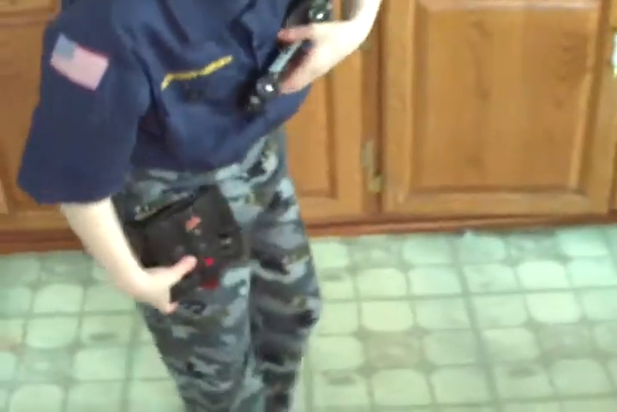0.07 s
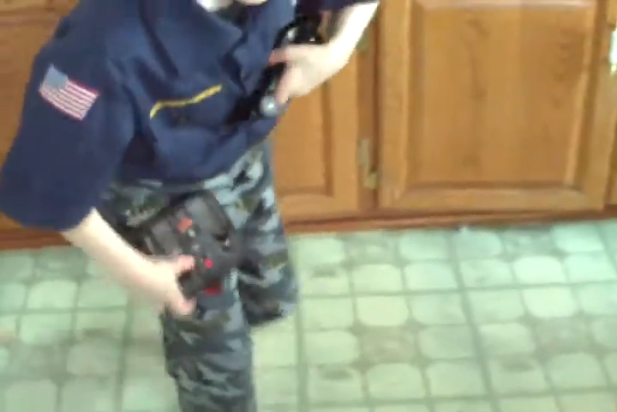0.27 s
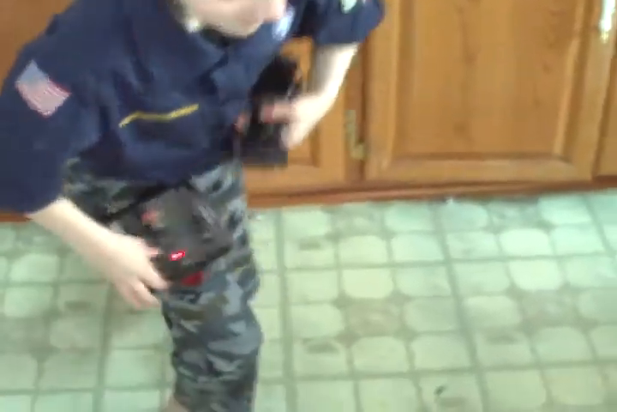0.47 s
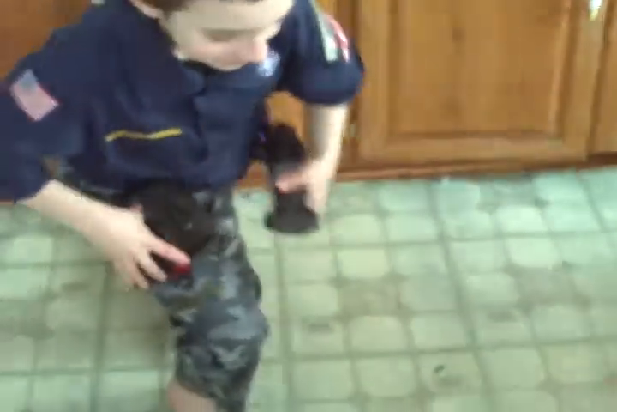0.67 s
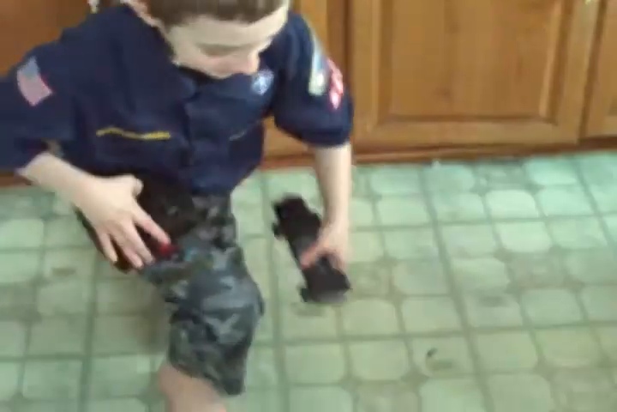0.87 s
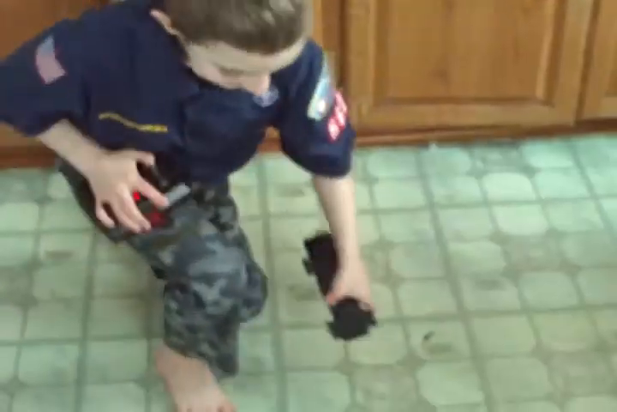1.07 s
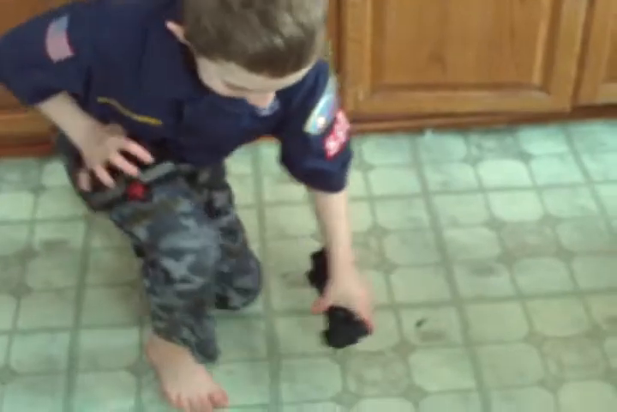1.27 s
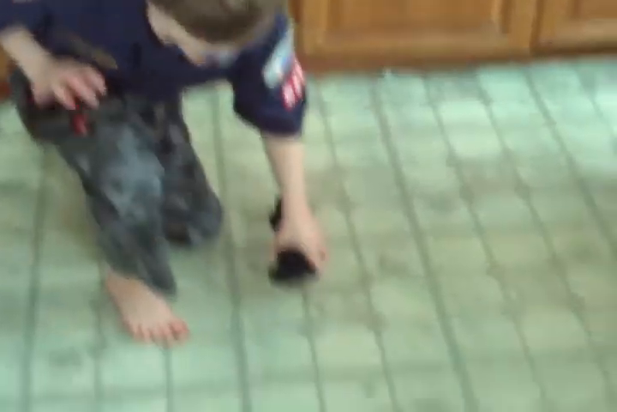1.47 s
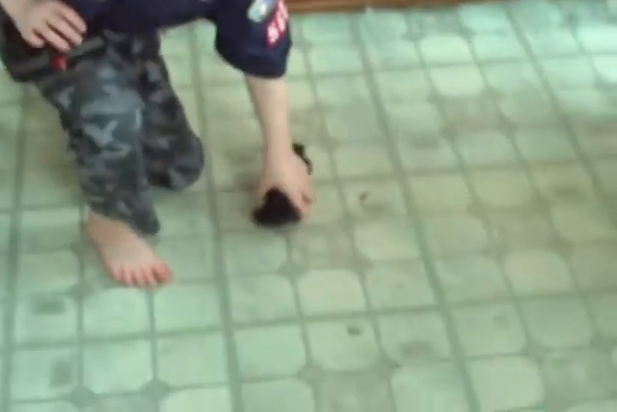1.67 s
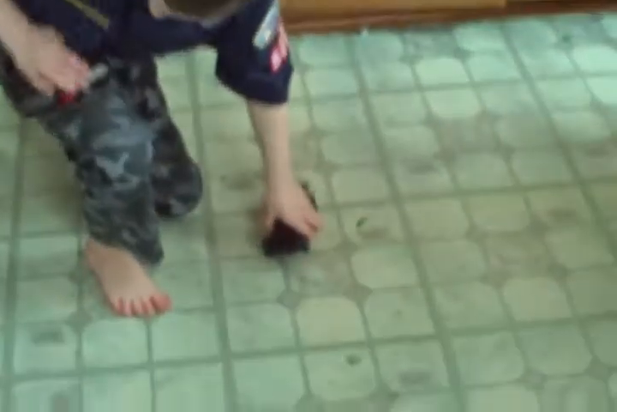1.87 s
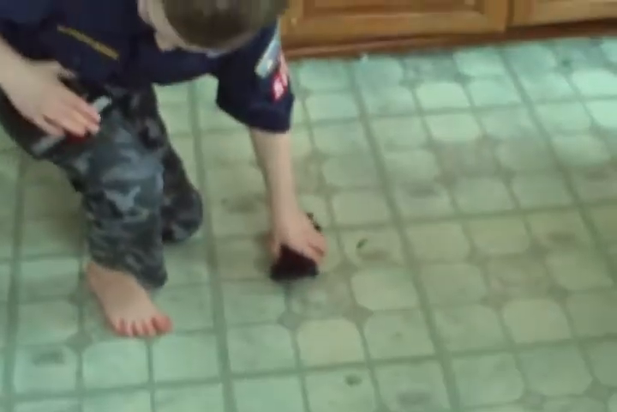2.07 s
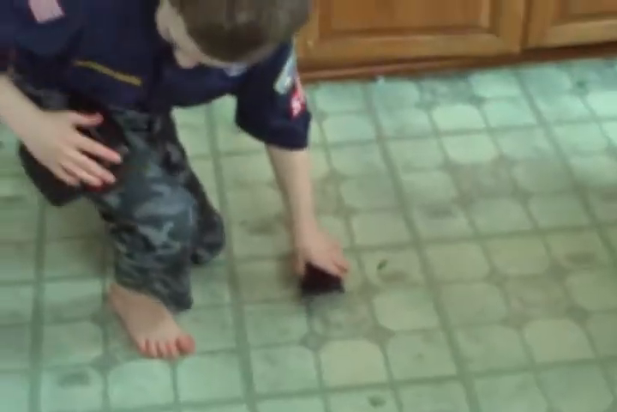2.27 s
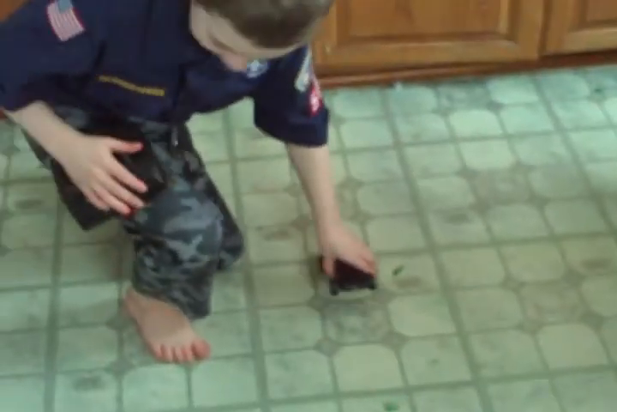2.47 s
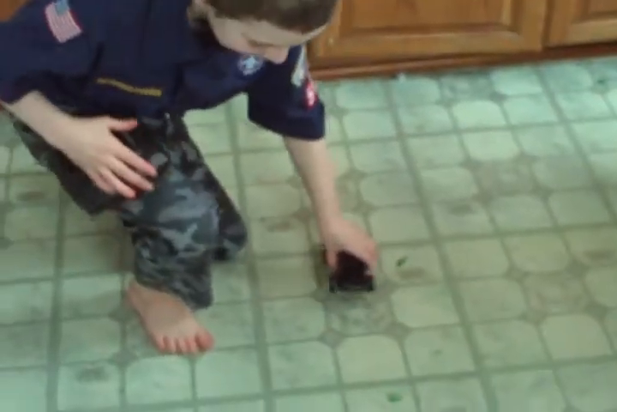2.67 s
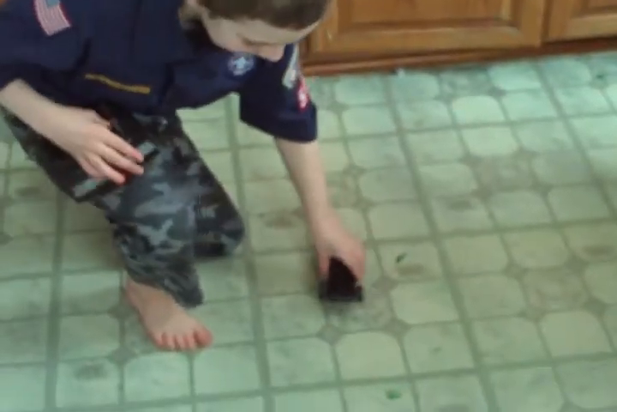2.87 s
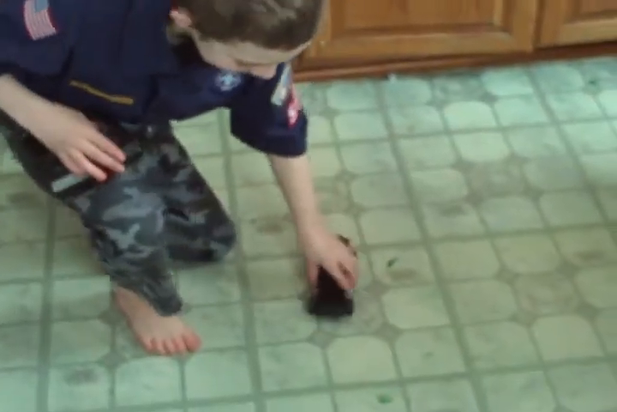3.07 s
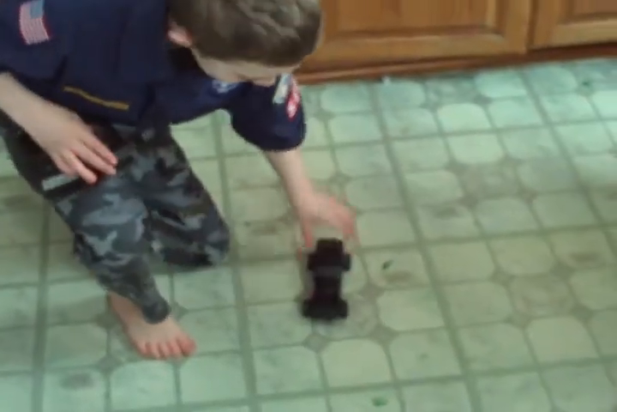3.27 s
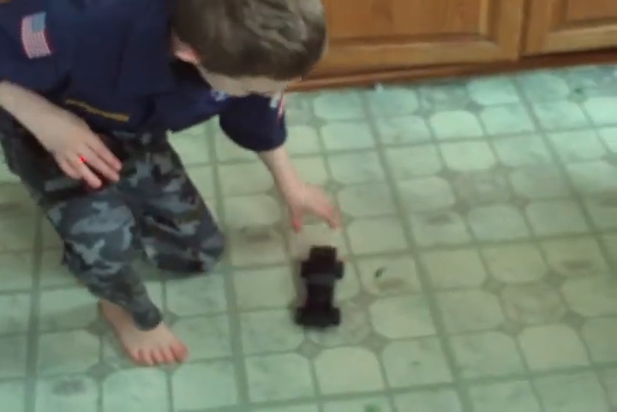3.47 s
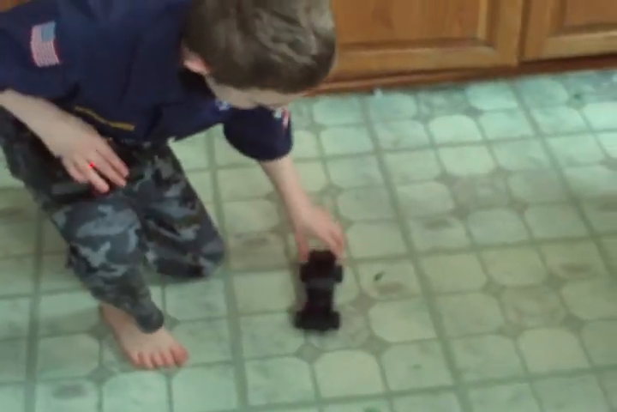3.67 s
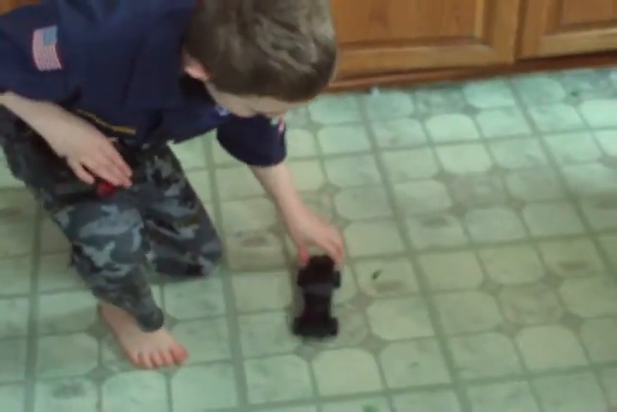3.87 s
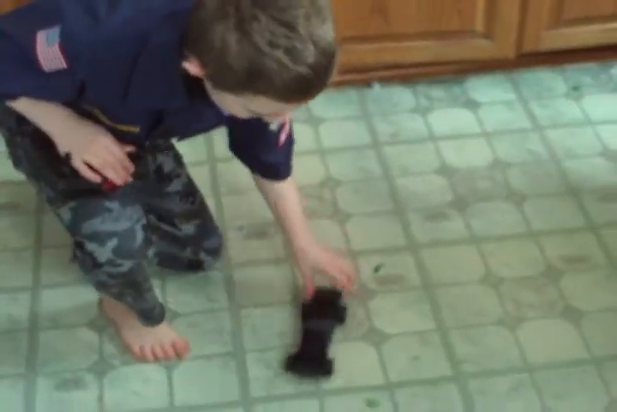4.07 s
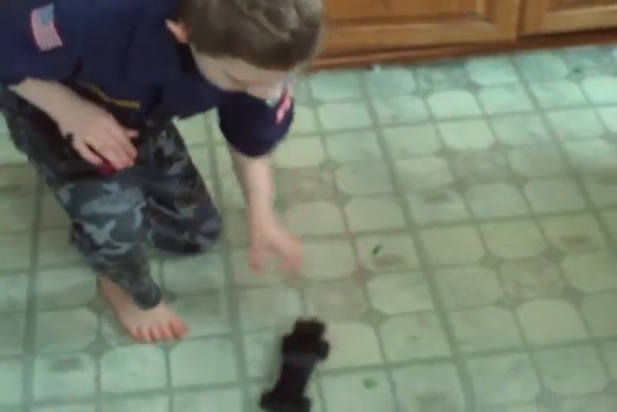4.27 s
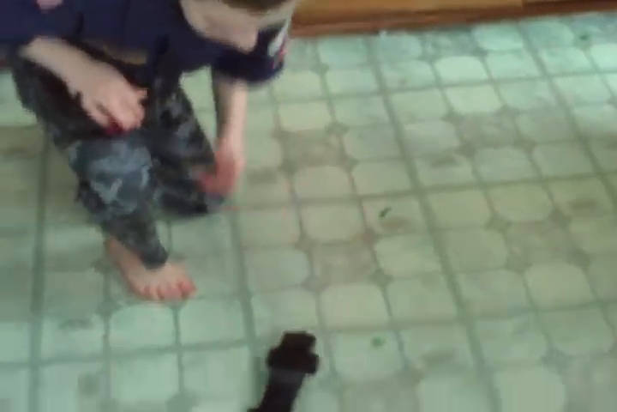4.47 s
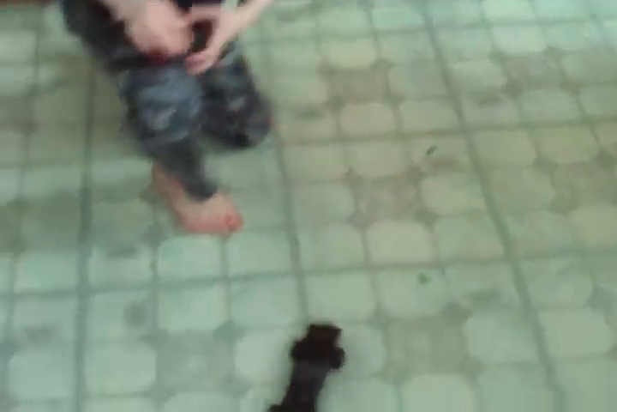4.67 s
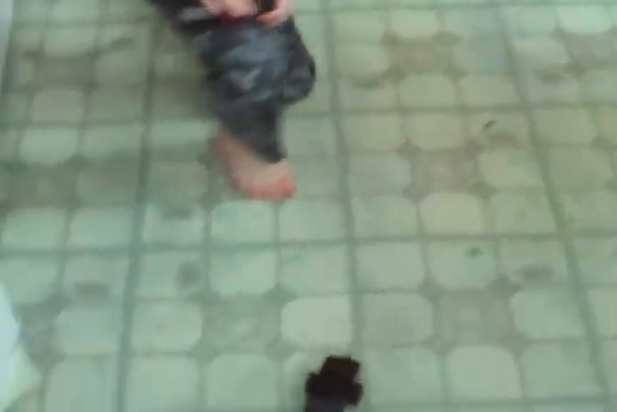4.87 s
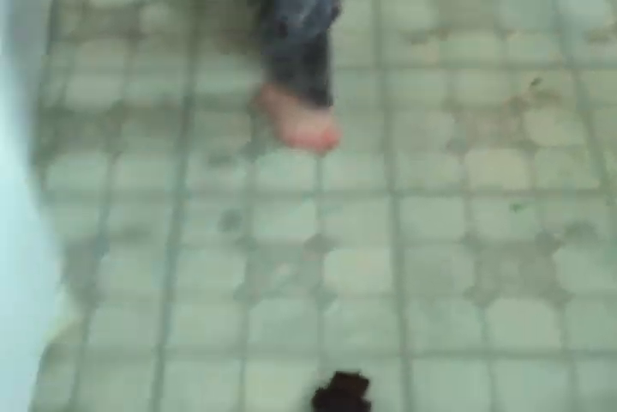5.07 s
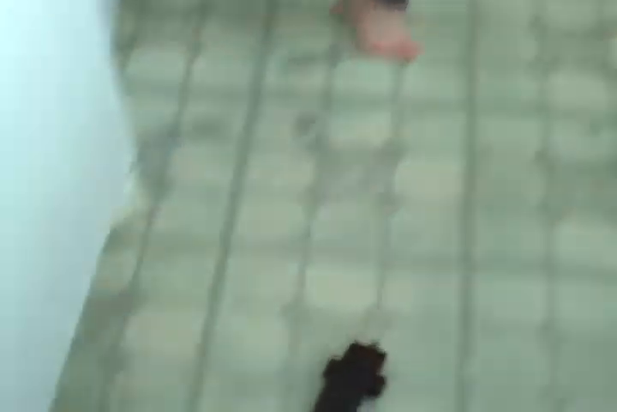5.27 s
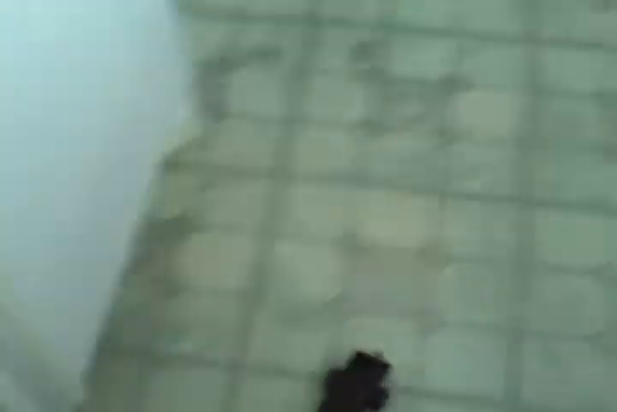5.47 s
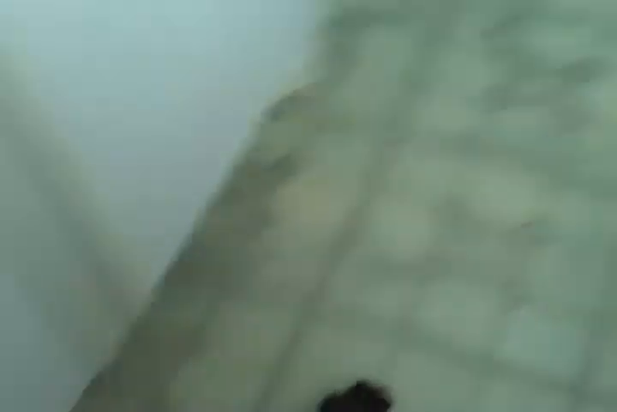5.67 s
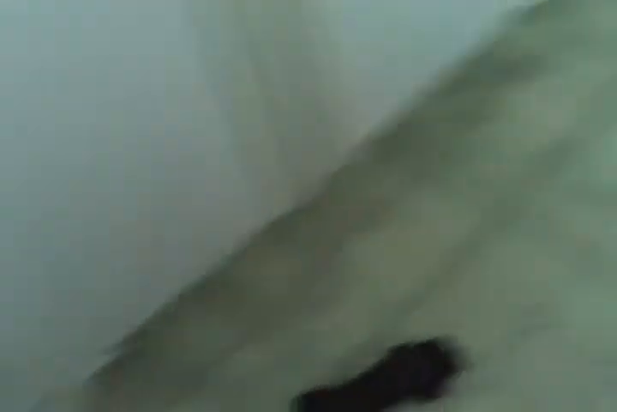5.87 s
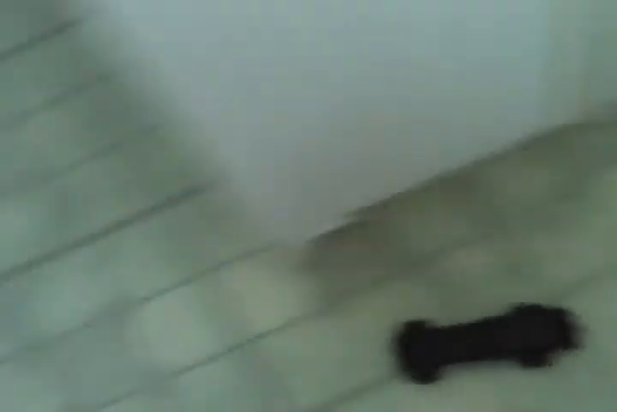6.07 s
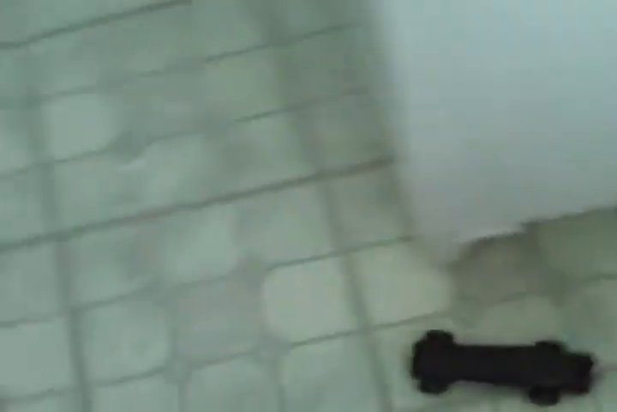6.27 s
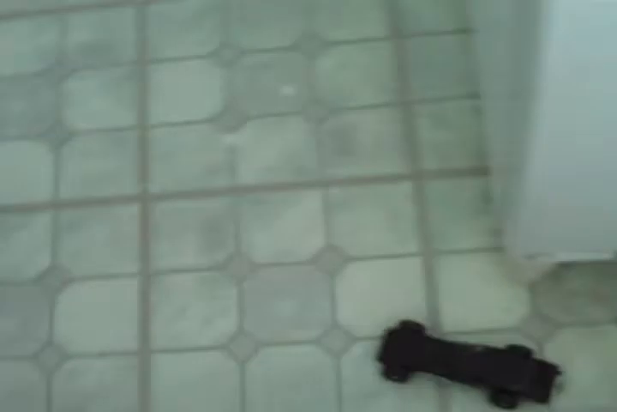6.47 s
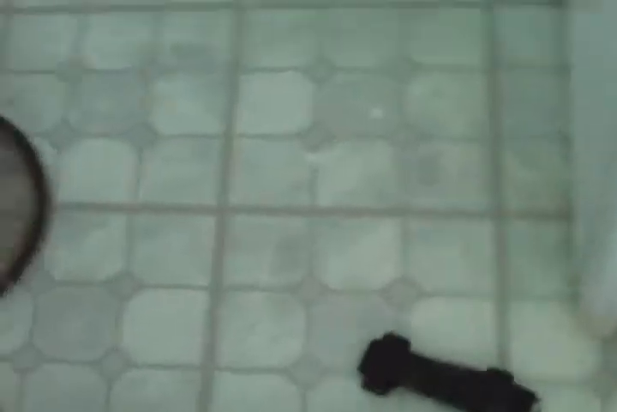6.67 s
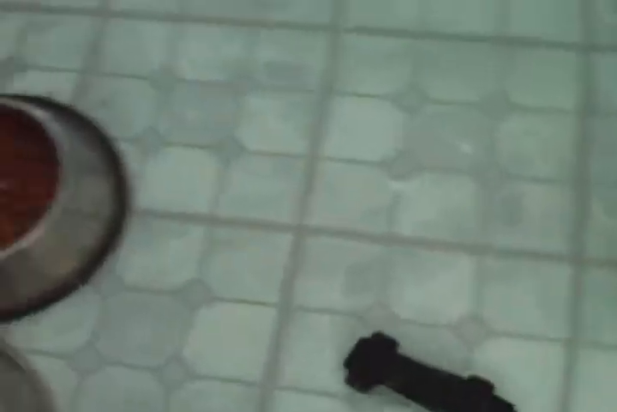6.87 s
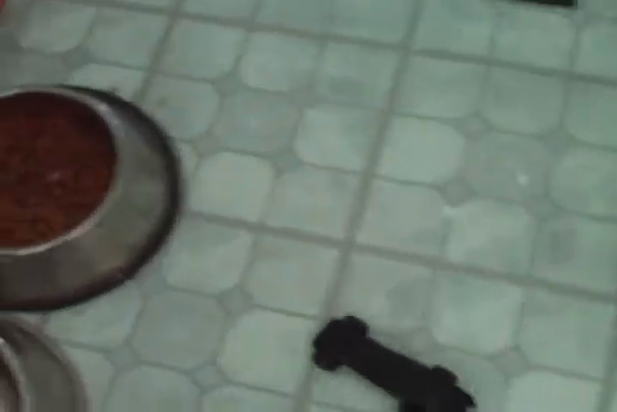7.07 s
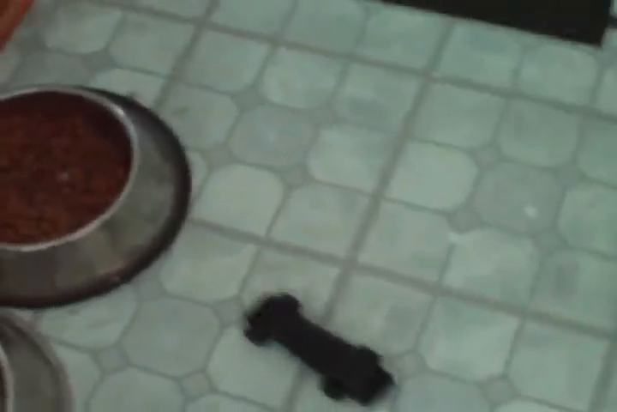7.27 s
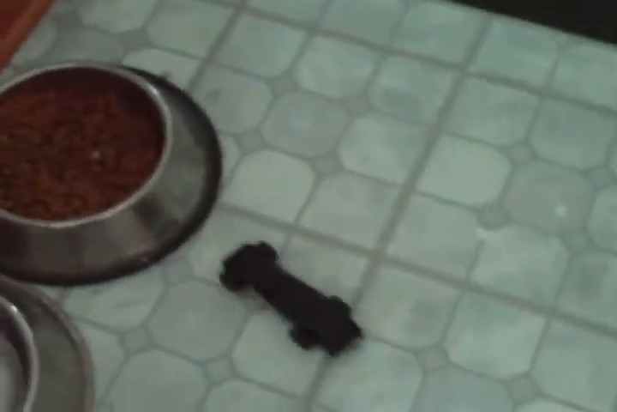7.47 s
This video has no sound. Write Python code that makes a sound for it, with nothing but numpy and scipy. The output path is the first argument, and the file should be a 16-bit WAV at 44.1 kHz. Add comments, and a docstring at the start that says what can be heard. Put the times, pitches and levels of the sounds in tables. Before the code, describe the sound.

A plastic toy car is handled and set down, then drives across a tile floor with a steady motor whine and rattling gears.

```python
"""First comes the faint rush and hum of a kitchen. Fingers click on a plastic toy car, a knee lands
with a thud, and the car is set down on the tiles. Then it drives off: its gears rattle in the shell,
its tyres drum on the floor and its small electric motor whines at a steady speed.
Soft footsteps follow it, and the fridge's drone grows as the listener passes by."""
import sys
import numpy as np
from scipy import signal
from scipy.fft import rfft, irfft, next_fast_len
from scipy.io import wavfile
from scipy.ndimage import map_coordinates

SR = 44100
rng = np.random.default_rng(int(sys.argv[2]) if len(sys.argv) > 2 else 0)


def inscribe(sig):
    """Save sig as 16-bit PCM at rate SR to the path in sys.argv[1].

    A 1-D sig is mono; a 2-D sig holds one channel per row.
    Samples are clipped to [-1, 1] before scaling.
    """
    pcm = np.round(np.clip(np.atleast_2d(sig).T, -1, 1) * 32767)
    wavfile.write(sys.argv[1], SR, pcm.astype(np.int16))


N = 331829


def amp(db):
    """Turn decibels into a gain."""
    return 10 ** (np.asarray(db) / 20)

def unit(x):
    """Scale a sound to an average (rms) level of 1."""
    return x / np.sqrt(np.mean(x ** 2) + 1e-20)

def clock():
    """The time of every sample, in seconds."""
    return np.arange(N) / SR

def curves(rows):
    """Join timed rows with straight lines: one curve for each column after the time."""
    times, *columns = np.transpose(rows)
    return [np.interp(clock(), times, column) for column in columns]

def fade_in(start, length):
    """Silence until start, then a ramp to 1."""
    return np.clip((clock() - start) / length, 0, 1)

def passing(middle_s, width_s):
    """A smooth rise to 1 and fall around middle_s."""
    return np.exp(-((clock() - middle_s) / width_s) ** 2)

def wobble(rate):
    """A smooth curve through rate random values a second."""
    return map_coordinates(rng.standard_normal(4096), [clock() * rate], mode="wrap")

def filtered(x, response):
    """Scale and shift each frequency of x by response(hz)."""
    size = next_fast_len(len(x) + SR // 4)
    return irfft(rfft(x, size) * response(np.fft.rfftfreq(size, 1 / SR)), size)[:len(x)]

def coloured(x, spectrum):
    """Shape the tone of x by rows of frequency in Hz and gain in dB."""
    size = 8192
    hz, db = np.transpose(spectrum)
    shape_db = np.interp(np.log(np.fft.rfftfreq(size, 1 / SR) + 1), np.log(hz + 1), db)
    cepstrum = irfft(np.log(amp(shape_db)))
    fold = np.r_[1, np.full(size // 2 - 1, 2), np.zeros(size // 2)]  # nothing rings before its blow
    return signal.fftconvolve(x, irfft(np.exp(rfft(cepstrum * fold))))[:len(x)]

def resonance(f, hz, width):
    """How a part that rings at hz answers the frequency f."""
    return 1j * f * width / (hz * hz - f * f + 1j * f * width)

def ringing(x, modes):
    """Let x ring a set of resonances; the soft plastic damps the treble."""
    peaks = lambda f: sum(amp(db) * resonance(f, hz, width) for hz, width, db in modes)
    return filtered(x, lambda f: peaks(f) / (1 + (f / 2950) ** 16))

def in_room(x, wet_db, echo_s=0.29):
    """Add the room's echo: noise that follows the energy of x and dies away."""
    decay = np.pad(amp(-120 * np.arange(SR // 2) / SR / echo_s), (SR // 300, 0))
    energy = np.abs(signal.fftconvolve(x ** 2, decay / decay.sum())[:len(x)])
    return x + amp(wet_db) * np.sqrt(energy) * rng.standard_normal(len(x))

def add(track, s, sound):
    """Mix a sound into the track at s seconds."""
    part = track[round(s * SR):][:len(sound)]
    part += sound[:len(part)]

def impacts(rate, spread_db):
    """Irregular tiny blows of uneven size, about rate a second."""
    hits = rng.random(N) < rate / SR
    return hits * amp(spread_db * rng.standard_normal(N)) * np.sign(rng.standard_normal(N))


# The air's tone. Each row of a TONE table: frequency in Hz, relative strength in dB.
AIR_TONE = [(20, -10.5), (35, -9), (58, -8.5), (80, -11), (105, -2), (135, -1.5), (210, -5.5), (330, -8),
            (450, -9), (700, -15.5), (1060, -15.5), (1250, -24.5), (1550, -25.5), (2000, -29.5),
            (2500, -30), (3200, -32), (4600, -36.5), (5700, -43.5), (7100, -58.5), (7500, -85.5)]
# Mains and compressor hum. Each row: pitch in Hz, level in dB.
APPLIANCE_HUM = [(59.3, -38), (129, -43)]
def background():
    """Air rushes and appliances hum; the fridge's drone grows as the listener passes it."""
    def hum(hz, db):
        level = np.sqrt(2) * amp(db + 0.26 * wobble(1.6))
        return level * np.sin(2 * np.pi * hz * clock() + 0.18 * wobble(5))
    air = amp(-29 + 0.38 * wobble(3.9)) * unit(coloured(rng.standard_normal(N), AIR_TONE))
    fridge = hum(hz=240, db=-39 + 11.5 * passing(6.83, 0.92))
    return air + fridge + sum(hum(hz, db) for hz, db in APPLIANCE_HUM)

# Each row: start in seconds, then click level, shell ring and treble lift, all in dB.
FINGER_TAPS = [(.125, -53.5, -63, -6), (0.675, -56, -66, 4), (0.686, -55.5, -63, 0),
               (0.718, -54.5, -58.5, 3), (2.023, -41.5, -43.5, -14), (2.66, -36, -41, -23.5)]
def taps():
    """Fingers click on the plastic; a harder touch is brighter."""
    out = np.zeros(N)
    for s, click_db, shell_db, hard_db in FINGER_TAPS:
        add(out, s, contact(click_db, shell_db, click_db - 24.5, hard_db, count=1))
    return out

def blow(t60, wet_db, count, gap_s=0.021, loss_db=13.5):
    """A noisy hit and its weaker rebounds, count in all; each fades by 60 dB in t60 seconds."""
    t = np.arange(SR // 2) / SR
    energy = sum((t >= k * gap_s) * amp(-loss_db * k - 60 * np.abs(t - k * gap_s) / t60) ** 2
                 for k in range(count))
    rise = 1 - np.exp(-t / 0.0007)  # plastic yields a little before it cracks
    return in_room(rng.standard_normal(len(t)) * np.sqrt(energy) * rise, wet_db)

# Hard plastic's crack and a hollow knock. Each row: frequency in Hz, relative strength in dB.
SNAP_TONE = [(500, -9.5), (1100, -5.5), (1500, 3.5), (1780, 5), (1950, 1), (2250, -9.5), (3100, -5.5),
             (3600, -14), (4300, -11.5), (5000, -22), (5700, -19.5), (6200, -37), (7400, -36.5)]
KNOCK_TONE = [(200, -27.5), (450, -4.5), (650, 4.5), (1100, 1), (1450, -7.5), (2000, -22), (6000, -51)]
# How the shell and chassis ring. Each row: pitch in Hz, width in Hz, relative strength in dB.
SHELL_MODES = [(1450, 140, -30), (2110, 190, -2.5), (2265, 74, -3), (2450, 97, -13), (2920, 200, -16.5)]
CHASSIS_MODES = [(2320, 30, 0)]
def contact(click_db, shell_db, knock_db, hard_db, count, thud_db=-np.inf, chassis_db=-np.inf):
    """A sharp crack rings the shell over a hollow knock; chassis and floor may join in."""
    crack = blow(t60=0.012, wet_db=0.8, count=count)
    snap = amp(click_db) * coloured(unit(coloured(crack, SNAP_TONE)), [(3400, 0), (5600, hard_db)])
    shell = amp(shell_db) * unit(ringing(crack, SHELL_MODES))
    chassis = amp(chassis_db) * unit(ringing(crack, CHASSIS_MODES))
    # heavier parts stay in contact longer and answer mostly through the room
    push = blow(t60=0.023, wet_db=7, count=count)
    knock = amp(knock_db) * unit(coloured(push, KNOCK_TONE))
    return snap + shell + chassis + knock + amp(thud_db) * thud(push)

# Each row: middle and half-length in seconds, pitch and width in Hz, level in dB.
PLASTIC_SCRAPES = [(0.736, .03, 3520, 1400, -46), (1.074, 0.029, 3250, 1000, -38),
                   (4.054, 0.061, 2840, 900, -39.5), (4.162, 0.055, 1500, 600, -29),
                   (4.312, 0.022, 5160, 600, -42), (5.328, 0.081, 2390, 400, -25),
                   (5.496, .035, 2520, 420, -26.5), (5.603, 0.11, 2450, 400, -28.5),
                   (5.876, 0.12, 4020, 1500, -47), (6.109, 0.034, 5300, 600, -40),
                   (6.145, 0.014, 3300, 1600, -38)]
def scrapes():
    """Wheels and plastic catch and slip: in the hand, on setting off and on veering."""
    out, t = np.zeros(N), np.arange(-SR // 4, SR // 4) / SR
    for s, half_length, hz, width, db in PLASTIC_SCRAPES:
        slips = in_room(impacts(rate=420, spread_db=5.5)[:len(t)], wet_db=1)
        rasp = filtered(slips, lambda f: resonance(f, hz, width) ** 2)
        add(out, s + t[0], amp(db) * unit(rasp) * np.exp(-(t / half_length) ** 2))
    return out

# The hollow body's notes. Each row: pitch in Hz, relative strength in dB.
BODY_MODES = [(690, -2), (1040, -2), (1430, -1)]
# Each row: start in seconds, level in dB, ring time in seconds, softness in dB lost per octave.
BODY_KNOCKS = [(.739, -17, 0.043, 18), (1.064, -37, 0.2, 0)]
def knocks():
    """Dull blows ring the hollow body as the hand damps it; a softer blow has less treble."""
    out, t = np.zeros(N), np.arange(SR // 2) / SR
    for s, db, t60, soft_db in BODY_KNOCKS:
        ring = sum(amp(level - soft_db * np.log2(hz / BODY_MODES[0][0]))
                   * np.sin(2 * np.pi * hz * t + 0.43 * wobble(80)[:len(t)]) for hz, level in BODY_MODES)
        add(out, s, ring * amp(db - 60 * t / t60) * (1 - np.exp(-t / 0.00092)))
    return out

def knee(start_s=0.9975, push_hz=59):
    """The floor gives under a knee with one soft push and a dull thud."""
    out = np.zeros(N)
    add(out, start_s, amp(-14) * np.hanning(round(SR / push_hz / 2)))
    add(out, start_s, amp(-43) * thud(blow(t60=0.09, wet_db=8, count=2)))
    return out

# The floor under a blow. Each row: frequency in Hz, relative strength in dB.
THUD_TONE = [(70, -35.5), (120, 6.5), (330, -4.5), (520, -11.5), (900, -37), (3000, -66)]
# How the floor rings. Each row: pitch in Hz, width in Hz, relative strength in dB.
FLOOR_MODES = [(103, 16, -2), (130.3, 8, -4.5), (156.4, 9.7, -1.5), (186, 12, -2), (207, 10, -3),
               (310, 18, 4.5), (361, 8.7, -4)]
def thud(push):
    """The floor answers a push with a dull sound and rings on."""
    dull = coloured(push, THUD_TONE)
    return unit(unit(dull) + amp(-3) * unit(ringing(dull, FLOOR_MODES)))

# The knee, then the feet. Each row: start in seconds, board swing in dB, rumble in dB.
FOOTFALLS = [(1.009, -7, -23), (4.939, -31, -30.5), (5.577, -20.5, -26), (5.691, -30, -36.5),
             (6.271, -28, -38), (6.891, -36, -27), (6.96, -28, -31.5), (7.453, -24, -40)]
# The boards' notes. Each row: pitch in Hz, relative strength in dB, ring time in seconds.
BOARD_MODES = [(45.7, 3.5, 0.59), (33, -18, .18), (70, -19.5, .12), (102, 2, 0.098), (146, -17, 0.35)]
# The rumble. Each row: frequency in Hz, relative strength in dB.
RUMBLE_TONE = [(10, -13.5), (22, -7.5), (40, -2.5), (75, -4.5), (130, -19.5), (300, -58), (1000, -100)]
def steps():
    """Soft, heavy contacts set the floorboards swinging over a short rumble."""
    out, t = np.zeros(N), np.arange(SR) / SR
    for s, swing_db, rumble_db in FOOTFALLS:
        swing = sum(amp(db - 60 * t / t60) * np.sin(2 * np.pi * hz * t) for hz, db, t60 in BOARD_MODES)
        rumble = unit(coloured(rng.standard_normal(len(t)), RUMBLE_TONE)) * amp(-60 * t / 1.5)
        add(out, s, (amp(rumble_db) * rumble - amp(swing_db) * swing) * (1 - np.exp(-t / 0.0029)))
    return out

# Each row: start in seconds, then click, shell ring, knock, floor thud and treble lift, all in dB.
CAR_LANDINGS = [(1.046, -51, -63, -49, -69, 6), (1.054, -41, -51, -39, -56, 3.5),
                (1.068, -50, -53, -39, -57, 1), (1.097, -49, -54, -48, -62, 2),
                (1.128, -56, -56, -47, -62, 0), (3.062, -39, -39, -45, -49, 5),
                (3.091, -35.5, -29.5, -35, -31.5, 11), (3.111, -43, -39, -40, -30, 3),
                (3.136, -53, -43, -54, -56, 4)]
def landings():
    """The car is knocked or set down: its loose body rebounds and its chassis rings."""
    out = np.zeros(N)
    for s, click_db, shell_db, knock_db, thud_db, hard_db in CAR_LANDINGS:
        add(out, s, contact(click_db, shell_db, knock_db, hard_db, count=2,
                            thud_db=thud_db, chassis_db=shell_db - 7.5))
    return out

# Each row: pitch in Hz, level in dB, ring time in seconds.
SPRING_MODES = [(1030, -38, 2.2), (1125, -42, 1.5), (3050, -42, .7), (3140, -42.5, 0.7)]
def spring(start_s=2.023):
    """One finger tap sets off a faint, lingering ring, like a suspension spring."""
    out, t = np.zeros(N), np.arange(SR) / SR
    for hz, db, t60 in SPRING_MODES:
        ring = np.sin(2 * np.pi * hz * t + wobble(69)[:len(t)])
        add(out, start_s, amp(db - 60 * t / t60) * ring)
    return out

ROLL_START_S, ROLL_RISE_S = 3.97, 0.049  # the wheels begin to turn
LAUNCH_S, LAUNCH_WIDTH_S = 4.32, 0.035  # the motor takes hold
CORNER_S, CORNER_WIDTH_S = 6.45, 1  # the car rounds the corner by the fridge
# Each row: time in seconds, then relative levels of gear rattle and shell ring in dB.
RATTLE_LEVELS = [(4.0, -40, -40), (4.06, -36, -26.5), (4.1, -37, -35), (4.2, -36.5, -27.5),
                 (4.65, -34.5, -31), (5.2, -35, -27), (5.42, -33, -30), (5.72, -31.5, -28.5),
                 (5.92, -24.5, -29), (6.02, -30, -26), (6.14, -24.5, -31), (6.38, -32.5, -29.5),
                 (6.95, -34.5, -30), (7.35, -38.5, -31.5), (7.52, -27.5, -41)]
# The teeth's rattle and fine hiss. Each row: frequency in Hz, relative strength in dB.
GEAR_TONE = [(700, -14.5), (1250, -17), (1450, -1.5), (1750, 3), (1950, 6), (2700, -11.5), (3200, -17.5),
             (4000, -24.5), (7000, -45.5)]
FIZZ_TONE = [(1500, -35), (2700, 5.5), (3300, -1.5), (3900, -1), (4500, -5), (4900, -10.5), (5650, -6.5),
             (6000, -30), (6400, -25), (7000, -26), (7400, -47.5)]
def gears():
    """Gear teeth chatter and ring the shell, with a fine hiss that follows the rattle."""
    gear_db, shell_db = curves(RATTLE_LEVELS)
    teeth = impacts(rate=1200, spread_db=1.5) * amp(0.83 * wobble(45) + 0.74 * wobble(13))
    chatter = in_room(teeth, wet_db=-4.5)
    rattle = amp(gear_db + 1) * unit(coloured(chatter, GEAR_TONE))
    shell = amp(shell_db + 0.5) * unit(ringing(chatter, SHELL_MODES))
    rattle_db = (gear_db + shell_db) / 2
    fizz_db = -36 + rattle_db - rattle_db[clock() > ROLL_START_S].mean()
    fizz_db += passing(LAUNCH_S, LAUNCH_WIDTH_S) - 1.5 * passing(CORNER_S, CORNER_WIDTH_S)
    ticks = in_room(impacts(rate=700, spread_db=4.5), wet_db=2)
    fizz = amp(fizz_db) * unit(coloured(ticks, FIZZ_TONE))
    return (rattle + shell) * fade_in(ROLL_START_S, ROLL_RISE_S) + fizz * fade_in(ROLL_START_S, 0.25)

# The tyres' scrub. Each row: frequency in Hz, relative strength in dB.
TREAD_TONE = [(150, -15), (280, 0), (420, -1.5), (520, -6.5), (750, -5.5), (1050, -8), (1250, -15),
              (1700, -36.5), (4000, -58)]
# Their drumming. Each row: time in seconds, relative level in dB, pitch in Hz.
TYRE_DRUM = [(4.04, -27.5, 151), (4.25, -29, 140.3), (4.35, -21.5, 132.2), (4.68, -19.5, 125.8),
             (5.05, -25, 149.9), (5.3, -22.5, 167.8), (6.15, -21.5, 162.3), (6.6, -25.5, 155.2),
             (6.95, -23, 145.3), (7.52, -19, 147.8)]
def tyres():
    """Knobbly tyres scrub, louder in the corner, and drum, a little harder as they first grip."""
    drum_db, centre_hz = curves(TYRE_DRUM)
    scrub = in_room(impacts(rate=900, spread_db=5), wet_db=5)
    tread = amp(-30.5 + 5 * passing(CORNER_S, CORNER_WIDTH_S)) * unit(coloured(scrub, TREAD_TONE))
    drum = amp(drum_db + 1.5 * passing(LAUNCH_S, LAUNCH_WIDTH_S)) * drumming(centre_hz)
    return (tread + drum) * fade_in(ROLL_START_S, ROLL_RISE_S)

def drumming(centre_hz, width_hz=27.4):
    """The tyres' throb shifts in pitch with speed and place, ringing the floor's notes in turn."""
    narrow = lambda f: 1 / np.sqrt(1 + (f / width_hz) ** 2) / (1 + (f / 120) ** 4)
    slow_noise = lambda: filtered(rng.standard_normal(N), narrow)
    turn = 2 * np.pi * np.cumsum(centre_hz) / SR
    band = slow_noise() * np.cos(turn) + slow_noise() * np.sin(turn)
    throb = filtered(band, lambda f: 1 - 1 / (1 + (f / 88) ** 12))  # cut the deepest bass
    return unit(throb + amp(2) * ringing(throb, FLOOR_MODES))

# Each row: start in seconds, then clatter, hollow knock and floor thud, all in dB.
SEAM_BUMPS = [(4.142, -47, -60, -67), (4.823, -44.5, -61, -47), (4.985, -57, -40.5, -48),
              (5.338, -42.5, -59, -58), (5.457, -37, -58, -46), (5.765, -54, -38, -43),
              (5.813, -40.5, -59, -52), (5.936, -35.5, -38, -47), (6.135, -42.5, -36, -26.5),
              (6.266, -48, -50.5, -34), (6.302, -41, -59, -40.5), (6.55, -40, -34, -30.5),
              (6.688, -43, -49, -50), (6.872, -44.5, -51, -45), (7.016, -47, -49, -52.5),
              (7.233, -41, -47, -37), (7.354, -43, -53, -47), (7.497, -39.5, -44, -38)]
def bumps():
    """The wheels jolt over seams in the floor."""
    out = np.zeros(N)
    for s, db, knock_db, thud_db in SEAM_BUMPS:
        add(out, s, contact(db, db + 3, knock_db, hard_db=-4, count=2, thud_db=thud_db))
    return out

# Each row: time in seconds, shaft turns a second.
MOTOR_SPEED = [(4.5, 283.1), (4.7, 282.9), (5.1, 281.8), (5.38, 283.2), (5.72, 283), (5.85, 281.8),
               (6.0, 282.8), (6.15, 282.7), (6.45, 283.7), (6.8, 284.1), (7.0, 283.7), (7.13, 282.5),
               (7.38, 283.7)]
# The whine, then tones at half and 2 to 5 times its pitch.
# Each row: time in seconds, relative level in dB.
WHINE_LEVELS = [(4.35, -30), (4.415, -24.5), (4.45, -26.5), (4.59, -22.5), (4.64, -29.5), (4.87, -17),
                (5.12, -28.5), (5.2, -24), (5.51, -28.5), (5.67, -21.5), (5.87, -42), (5.96, -27),
                (6.27, -25.5), (6.34, -22), (6.96, -23), (7.08, -36), (7.52, -21)]
WHINE_HALF = [(4.4, -51.5), (5.0, -39), (5.5, -44), (5.7, -36), (5.92, -44.5), (6.15, -32.5), (6.5, -35.5),
              (6.66, -44), (6.85, -32), (7.05, -44), (7.22, -33.5), (7.52, -44)]
WHINE_X2 = [(4.4, -40), (4.6, -38), (4.74, -42), (4.91, -35), (5.05, -44), (5.5, -31.5), (5.82, -50),
            (5.96, -30.5), (6.13, -45.5), (6.31, -30), (6.45, -43), (6.54, -30.5), (6.68, -34), (6.76, -35),
            (6.88, -36.5), (7.03, -30), (7.12, -45), (7.52, -39)]
WHINE_X3 = [(4.5, -44), (4.601, -53), (5.13, -45), (5.35, -51.5), (6.05, -48), (6.22, -44), (6.35, -51),
            (6.85, -42), (7.151, -53)]
WHINE_X4 = [(4.4, -53), (4.49, -41), (4.58, -47), (4.67, -41.5), (4.85, -49), (4.93, -42), (5.14, -52.5),
            (5.34, -41.5), (5.55, -48.5), (5.69, -43.5), (5.88, -47), (6.1, -49), (6.22, -45), (6.55, -46),
            (6.7, -49), (6.8, -43), (7.0, -45.5), (7.2, -46.5), (7.52, -47.5)]
WHINE_X5 = [(4.42, -45), (4.52, -63), (4.71, -63), (4.78, -48.5), (4.97, -46), (5.08, -55.5), (5.45, -48.5),
            (5.9, -53), (6.46, -46.5), (6.61, -56), (6.74, -48.5), (6.87, -57.5), (7.52, -51.5)]
# The shaft's hum and top overtones. Each row: multiple of the shaft's speed, relative level in dB.
SHAFT_HUM = [(1, -42.5), (5, -49.5)]
TOP_OVERTONES = [(18, -66), (22, -63.5), (24, -63)]
def motor(start_s=4.318, spin_up_s=0.03):
    """The motor spins up to a whine; each tone swells and fades across the room's standing waves."""
    (shaft_hz,), (whine_db,) = curves(MOTOR_SPEED), curves(WHINE_LEVELS)
    spin_up = 1 - 0.13 * np.exp(-np.maximum(clock() - start_s, 0) / spin_up_s)
    angle = 2 * np.pi * np.cumsum(shaft_hz * spin_up * (1 + 0.00065 * wobble(45))) / SR

    def tone(db, multiple):
        """Loose bearings roughen a tone's level and timing."""
        level = amp(db + 2.5 * wobble(40))
        return level * np.sin(round(multiple) * angle + (0.091 + 0.019 * multiple) * wobble(60))

    swelling = lambda table: sum(tone(db + 2 * wobble(7), multiple) for multiple, db in table)
    stutter_db = 5.5 * passing(start_s, 0.092) * wobble(70)  # until the gears settle
    whine = amp(whine_db - 1 + stutter_db + 0.5 * wobble(30)) * np.sin(4 * angle)
    hum = amp(-0.5 + 6 * passing(CORNER_S, CORNER_WIDTH_S)) * swelling(SHAFT_HUM)
    hum += tone(curves(WHINE_HALF)[0], 2)
    overtones = sum(tone(curves(levels)[0] + 1.5 * wobble(22), 4 * k)  # they flicker as the car shakes
                    for k, levels in enumerate([WHINE_X2, WHINE_X3, WHINE_X4, WHINE_X5], 2))
    upper = amp(1.5) * overtones + swelling(TOP_OVERTONES)
    return np.sqrt(2) * (whine * fade_in(start_s, 0.008) + (hum + upper) * fade_in(start_s, 0.14))

# The crackle. Each row: frequency in Hz, relative strength in dB.
GRIT_TONE = [(1500, -26.5), (3000, 5), (4200, 0), (4900, -12.5), (5500, -4), (6100, -18), (7400, -28)]
def grit():
    """Loose plastic ticks brightly as the car skirts the wall."""
    ticks = in_room(impacts(rate=110, spread_db=2.5), wet_db=5.5)
    return amp(-41.5) * passing(6.0, 0.59) * unit(coloured(ticks, GRIT_TONE))

def scene():
    """Everything heard from one spot above the floor."""
    driving = motor() + gears() + tyres() + scrapes() + grit()
    clatter = taps() + landings() + bumps() + knocks() + spring()
    return (driving + clatter + knee() + steps() + background())[None]

def record(dry):
    """Cut away the highest treble."""
    top_hz = 7350
    return np.array([filtered(channel, lambda hz: 1 / (1 + (hz / top_hz) ** 120)) for channel in dry])


dry = scene()
out = record(dry)
inscribe(out)
```